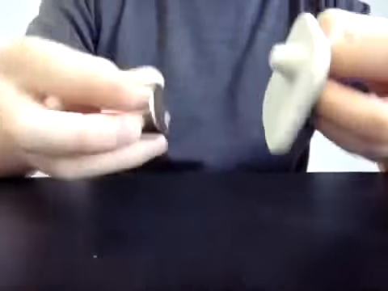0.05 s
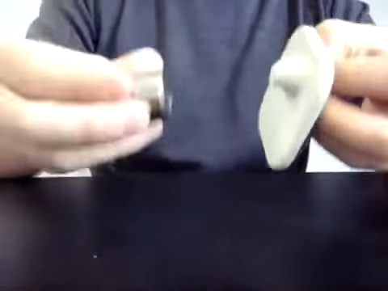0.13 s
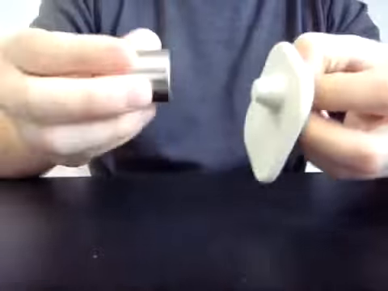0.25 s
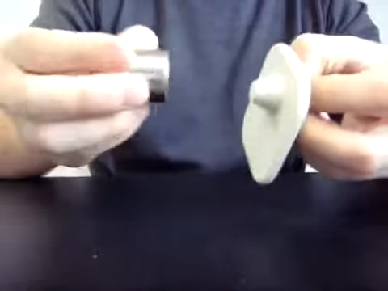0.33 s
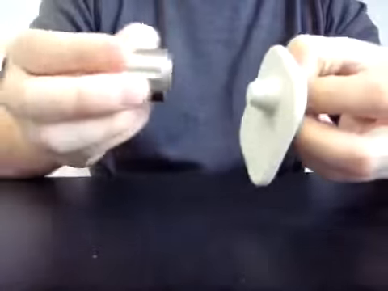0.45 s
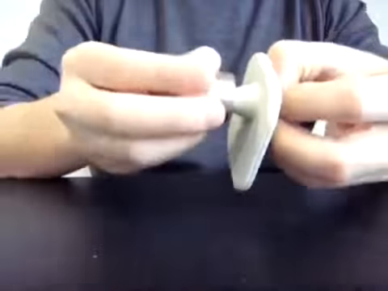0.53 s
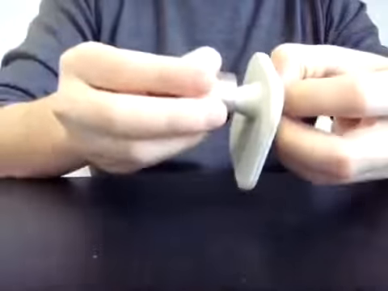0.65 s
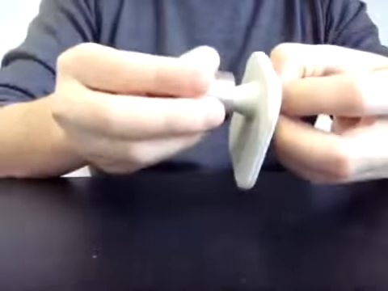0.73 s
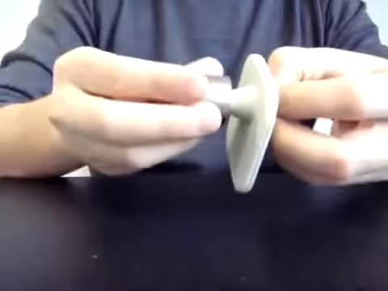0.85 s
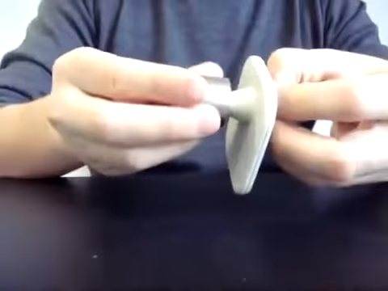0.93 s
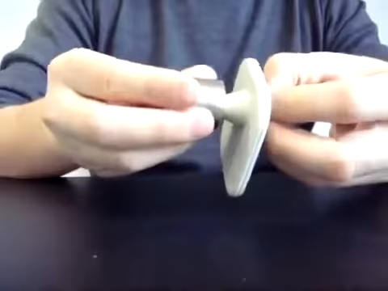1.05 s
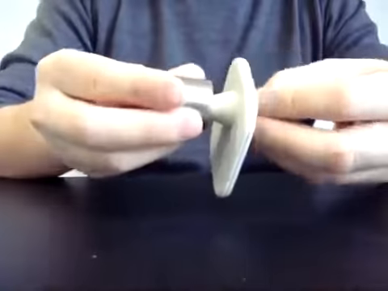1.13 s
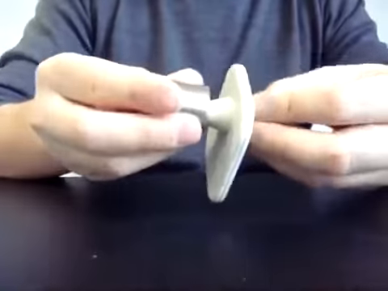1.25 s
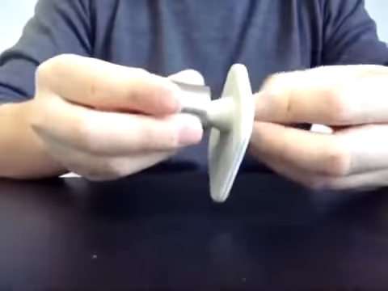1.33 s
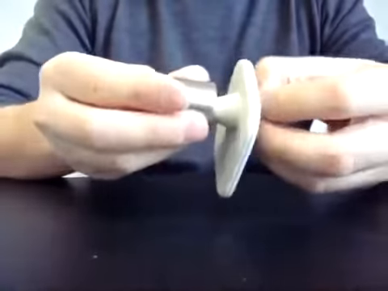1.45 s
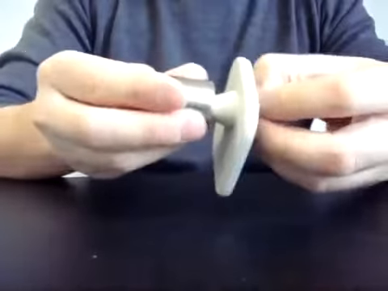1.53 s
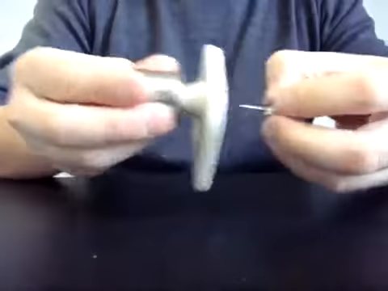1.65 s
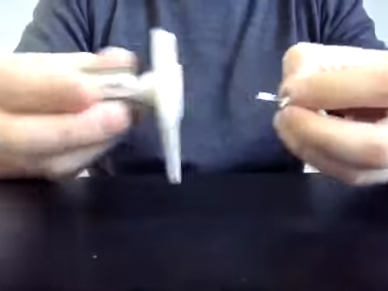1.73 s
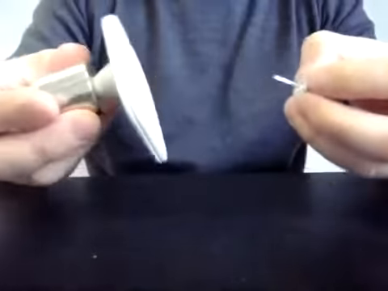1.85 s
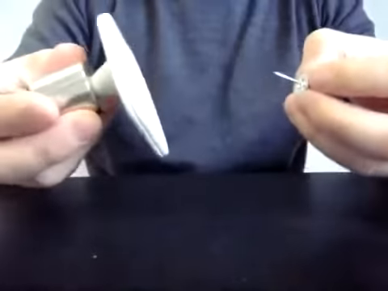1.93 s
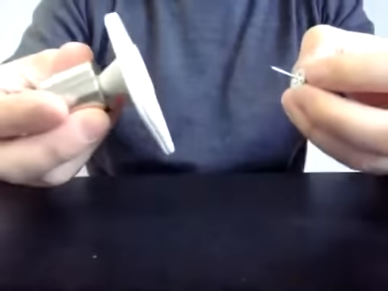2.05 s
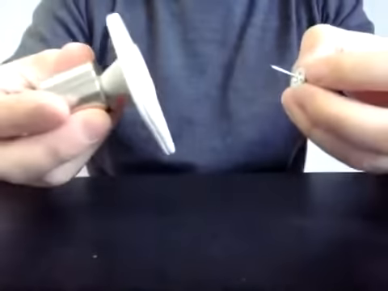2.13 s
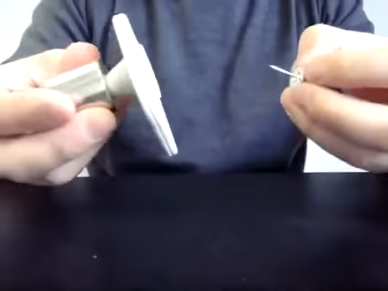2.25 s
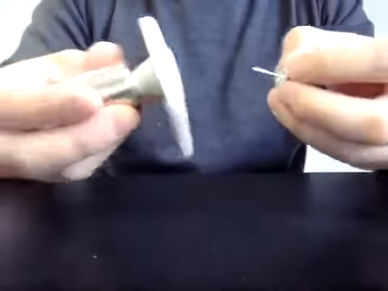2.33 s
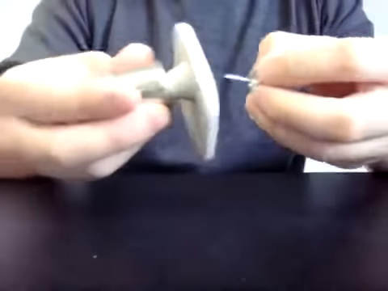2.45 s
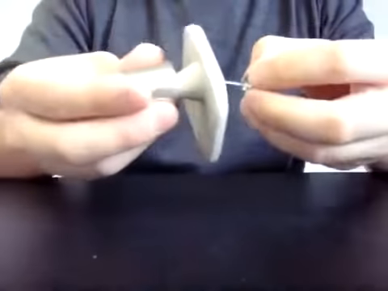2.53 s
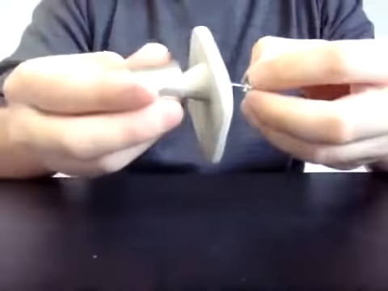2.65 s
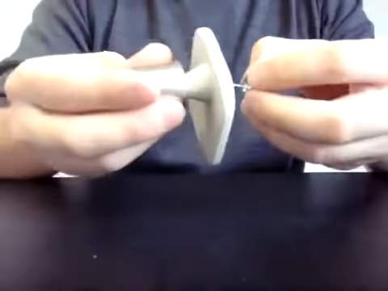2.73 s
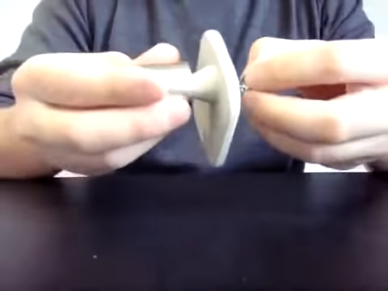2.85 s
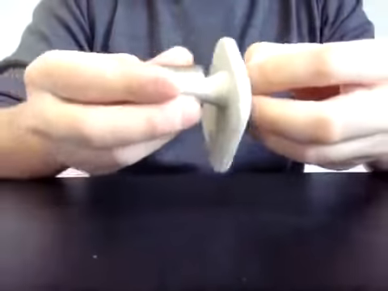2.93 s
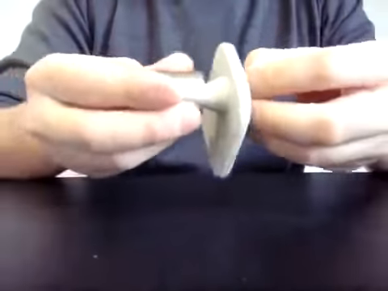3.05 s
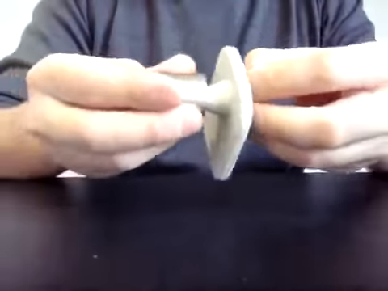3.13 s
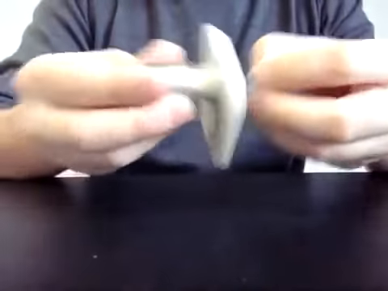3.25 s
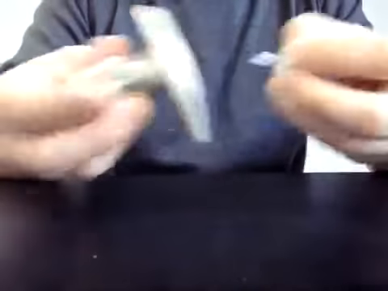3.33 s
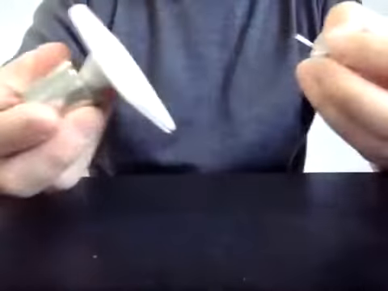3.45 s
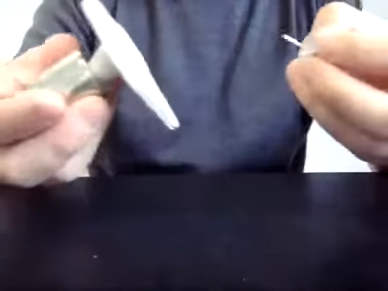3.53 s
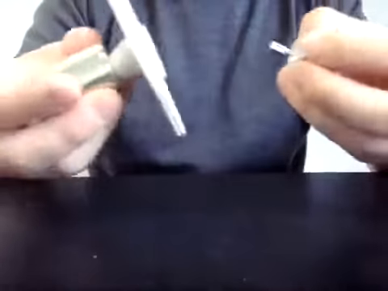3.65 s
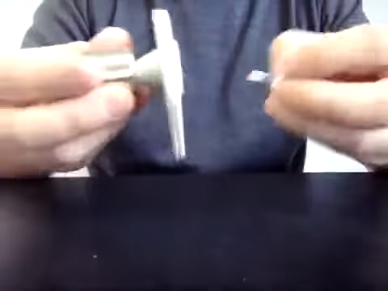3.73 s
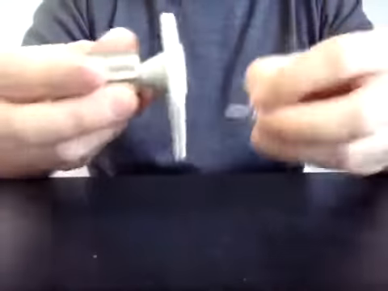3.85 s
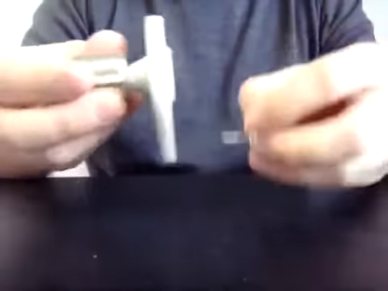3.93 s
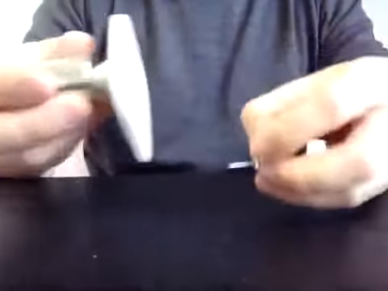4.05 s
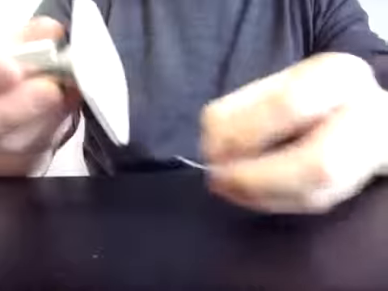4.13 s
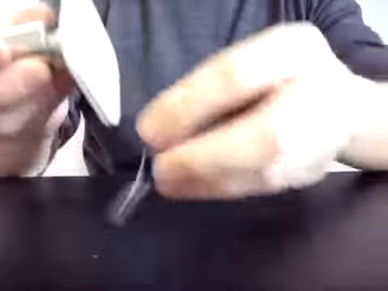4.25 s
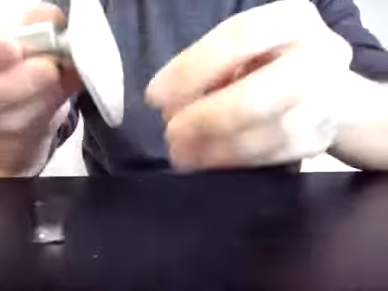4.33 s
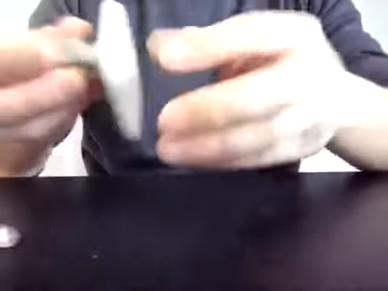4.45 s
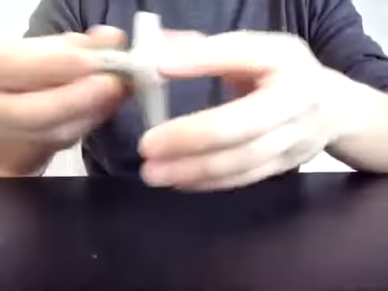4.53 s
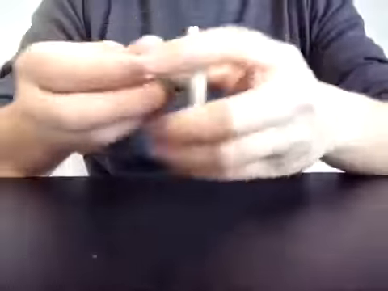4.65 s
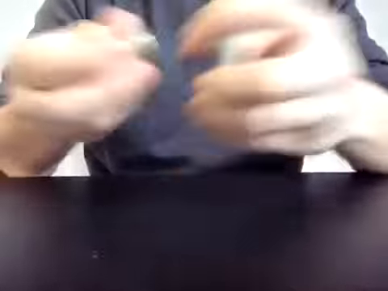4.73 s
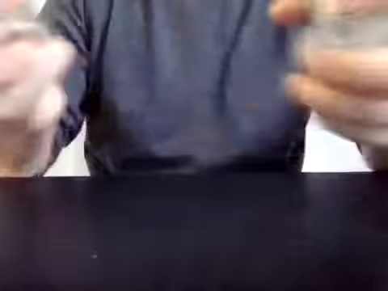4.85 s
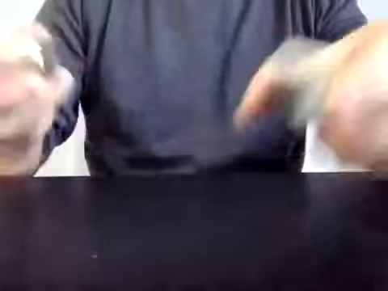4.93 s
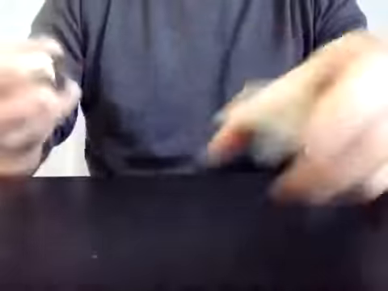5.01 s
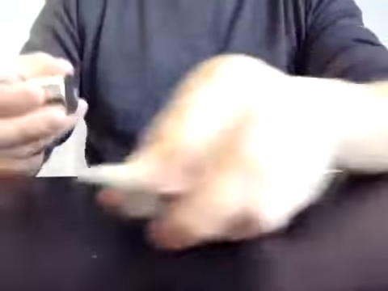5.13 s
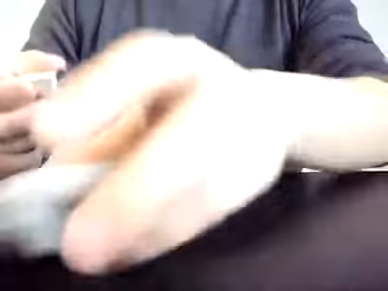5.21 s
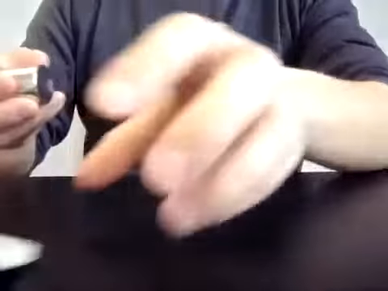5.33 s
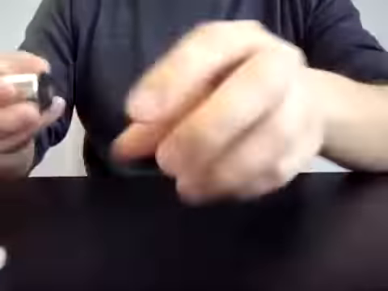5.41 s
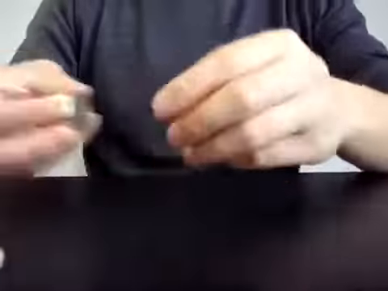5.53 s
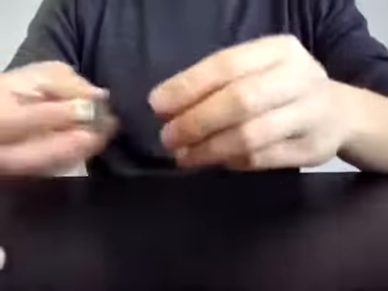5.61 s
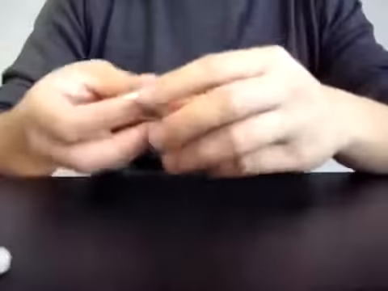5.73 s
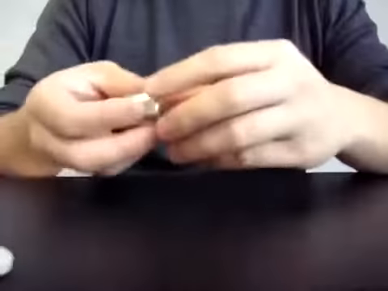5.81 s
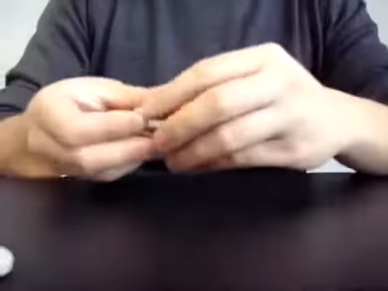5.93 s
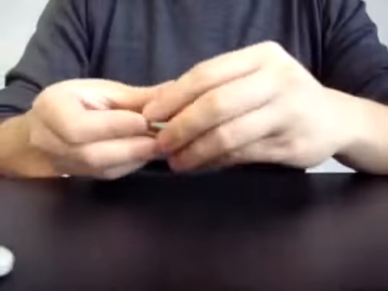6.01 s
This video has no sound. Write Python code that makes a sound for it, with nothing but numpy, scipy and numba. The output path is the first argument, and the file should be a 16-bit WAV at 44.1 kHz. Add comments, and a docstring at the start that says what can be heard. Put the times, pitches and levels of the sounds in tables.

```python
"""A steel magnet snaps onto a plastic tag close to a small microphone: ringing noise that fades band by band.
A pin ticks in and out of the tag, each tick a tiny gritty push that rings the magnet and tag.
The pin drops and bounces on a wooden table; the tag is pulled off, scraped and dumped there.
Blows ring the wood, rattles ring the loose tag, and shaped noise makes the rubbing and rustling.
A small room answers all but the snap and the background of hiss, a thin whine and a mains hum."""
import sys
import numpy as np
from scipy import signal
from scipy.fft import rfft, irfft
from scipy.io import wavfile
from scipy.ndimage import uniform_filter1d
from numba import njit

SR = 44100
rng = np.random.default_rng(int(sys.argv[2]) if len(sys.argv) > 2 else 0)


def log_audio(samples):
    """Write samples as a 16-bit WAV file to the path given in sys.argv[1]."""
    # one column per channel
    frames = np.atleast_2d(samples).T
    # limit to full scale, then quantise
    limited = np.clip(frames, -1, 1)
    pcm = np.round(limited * 32767).astype(np.int16)
    wavfile.write(sys.argv[1], SR, pcm)


N = 268128  # length of the scene in samples

# Hiss spectrum: (frequency [Hz], level per Hz [dB]); only its shape counts
HISS_SHAPE = [(15, -58), (25, -28), (60, -18), (170, -11.5), (450, -10.5), (756, -13), (2000, -18),
              (5760, -25), (9050, -29), (11000, -20)]
HISS_DB = -50.5
# Mains hum tones: (frequency [Hz], level [dB])
HUM_TONES = [(199.5, -59), (300.5, -61.5), (399.5, -70)]
WHINE_HZ, WHINE_WIDTH_HZ, WHINE_DB = 8980, 510, -66.5  # a narrow band of hiss

# Sleeves and skin rustling; the levels are those between 5 and 10 kHz:
# (start [s], turning point of the level [s], cut-off [s],
#  start level [dB], turning level [dB], level towards the cut-off [dB])
RUSTLES = [(0., .05, 0.41, -58, -62, -70), (1.58, 1.64, 1.72, -71, -66, -74),
           (3.3, 3.345, 3.37, -74, -52, -78), (4.15, 4.31, 4.375, -64, -51, -54),
           (4.44, 4.55, 4.67, -52, -49, -66), (4.67, 4.7, 4.745, -48, -49, -51),
           (4.87, 4.93, 4.96, -48, -54, -52), (4.945, 5.005, 5.04, -50, -40, -48),
           (5.025, 5.1, 5.17, -53, -50, -51), (5.155, 5.2, 5.285, -49, -44, -49),
           (5.29, 5.33, 5.5, -40, -40, -44), (5.485, 5.6, 5.76, -46, -49, -62)]
# Pin and fingers rubbing on the tag; levels are of the hollow sound, open grit is relative to it;
# a stroke cut off before its turning point never reaches it, one cut off before its start is silent:
# (start [s], turning point of the level [s], cut-off [s],
#  start level [dB], turning level [dB], level towards the cut-off [dB],
#  hollow pitch at start [Hz], hollow pitch at cut-off [Hz], open grit [dB])
RUB_STROKES = [(1.5, 1.68, 1.93, -63, -58, -65, 1250, 1450, -3),
               (2.68, 2.734, 2.7, -62, -50.5, -62, 970, 965, -14),
               (3.27, 3.31, 3.45, -61, -58.5, -67, 1480, 1230, 2),
               (4.18, 4.204, 4.17, -62, -48.5, -63, 1030, 1050, -22),
               (4.23, 4.26, 4.42, -58, -53, -70, 1100, 1250, -1),
               (4.86, 4.92, 4.985, -41, -47, -47, 1760, 2650, -16),
               (4.987, 5.02, 5.13, -45, -53.5, -60, 2590, 2540, -15),
               (5.155, 5.208, 5.228, -43, -33.5, -50, 1370, 1600, 0.5)]
# The tag dragged over the table:
# (start [s], turning point of the level [s], cut-off [s],
#  start level [dB], turning level [dB], level towards the cut-off [dB],
#  hollow pitch at start [Hz], hollow pitch at cut-off [Hz], open grit [dB])
DRAG_STROKES = [(5.292, 5.363, 5.48, -33, -28.5, -35, 1620, 1150, 7),
                (5.468, 5.49, 5.57, -40, -30, -60, 2480, 2300, -14)]
DRAG_RUMBLE_DB, DRAG_RUMBLE_HZ = -8, 95

# Resonances of magnet and tag held together: (frequency [Hz], width [Hz], level [dB])
HELD_MODES = [(966, 39, -4), (1375, 68, -10), (1620, 160, -7.5), (2250, 123, -2.5), (2356, 59, -1),
              (3030, 170, -4.5), (3460, 130, -7.5), (4104, 150, -2), (4260, 350, -3.5), (4660, 220, -4),
              (5020, 770, -4.5), (6990, 840, -3), (7650, 680, -9), (8450, 480, -6)]
# Resonances of the loose tag: (frequency [Hz], width [Hz], level [dB])
LOOSE_MODES = [(1550, 75, -28), (2020, 1340, 7.5), (2644, 27, 4), (3200, 370, -4.5), (3585, 110, -0.5),
               (3770, 27, -1.5), (4980, 50, -9.5), (5550, 170, -15), (6620, 280, -13.5), (9760, 1400, -14)]
# Resonances of the table top: (frequency [Hz], width [Hz], level [dB])
TABLE_MODES = [(313.6, 15, -0.5), (377, 36, -3.5), (508, 127, -0.5), (671, 29, -4), (840, 150, -2.5),
               (1160, 350, -1.5), (1357, 89, -10), (1750, 270, -9.5), (2250, 320, -14), (3170, 1000, -32)]

SNAP_S, SNAP_DB, SNAP_HOLD_S = .634, -16, 0.033  # start, level, time at full level
# How slowly the snap fades: (frequency [Hz], time to fall by 60 dB [s])
SNAP_FADE = [(200, 0.17), (600, 0.37), (990, 0.3), (1700, 0.38), (2340, 0.44), (3000, 0.21), (3700, 0.44),
             (4280, 0.53), (5000, 0.45), (7000, 0.42), (10000, 0.25)]

# Pin and clutch ticking in the held tag; the click is relative to the ringing body:
# (time [s], body level [dB], contact [s], click pitch [Hz], click level [dB])
TICK_HITS = [(1.588, -48.5, 0.0018, 4500, 12.5), (1.614, -49, 0.0058, 4670, 14),
             (1.644, -45, 0.0065, 4600, 3), (1.627, -48, .004, 6000, 4), (1.675, -37, .002, 8500, -3),
             (2.696, -47, 0.0017, 4900, 4), (2.8754, -31.5, 0.0026, 950, -24),
             (2.723, -50.5, 0.0039, 935, 5.5), (3.012, -46, 0.015, 1290, 10.5),
             (3.032, -32, 0.0061, 4340, 2), (3.0398, -14, .001, 4500, -0.5),
             (3.045, -14, 0.00096, 4900, -1), (3.0521, -22.5, 0.0021, 2360, -5.5),
             (3.071, -33, 0.0037, 3500, -5), (3.084, -41, .005, 2450, -6), (3.289, -40, 0.0028, 4530, -0.5),
             (3.305, -42, 0.0051, 1400, -5), (3.338, -40.5, 0.0032, 4770, 6),
             (3.357, -34, 0.0041, 4100, -2.5), (3.385, -43, 0.0025, 4940, -3)]
# treble tilt per octave; each second of contact would take off this much tilt, so long contacts are duller
TICK_TILT_DB, TICK_DULLING_DB_PER_S = 1.5, 1503

# Blows on the table; the click is relative to the ringing body:
# (time [s], body level [dB], click pitch [Hz], click level [dB])
KNOCK_HITS = [(4.385, 2.5, 1240, -5), (4.388, 5.5, 678, -3), (4.393, 4.5, 1010, -3.5),
              (4.398, -9.5, 1210, -5), (4.405, -12, 1030, -10), (4.412, -23, 1300, -3),
              (4.42, -21, 853, -9), (4.429, -3.5, 1030, -0.5), (4.4507, -18, 905, 1),
              (4.462, -22.5, 1130, 6), (4.468, -15.5, 760, -1), (4.49, -21, 920, -6),
              (4.5355, -23, 794, -6), (4.5395, -22, 1108, -2.5), (4.544, -22, 1350, -7),
              (4.61, -22.5, 990, -10), (4.613, -22.5, 1320, -5), (4.617, -26, 890, 0),
              (4.678, -24.5, 763, -10), (4.683, -18, 770, -5), (4.747, -3.5, 870, -9),
              (4.785, -8.5, 856, -7), (4.799, -22, 900, -4), (4.992, -28, 568, 0), (5.011, -22.5, 1560, -5),
              (5.155, -18, 1350, -6), (5.302, -3, 308, -10.5), (5.321, -13.5, 322, -6),
              (5.33, -13.5, 318, 4.5), (5.342, -7.5, 869, -.5), (5.348, -11, 540, -3.5),
              (5.374, -4, 1530, -18), (5.377, -10.5, 306, -3), (5.39, -3.5, 860, -11), (5.398, -7, 814, -6),
              (5.407, -7, 795, -4.5), (5.428, -12.5, 322, 1), (5.445, -4, 787, -4),
              (5.4715, -12.5, 880, -3.5), (5.504, -15, 764, -5), (5.53, -27.5, 335, -1.5),
              (5.734, -38.5, 826, -2)]
# contact of a 0 dB blow; weak blows last longer, by gain ** -softening; tilt per octave
KNOCK_CONTACT_S, KNOCK_SOFTENING, KNOCK_TILT_DB = .00005, 0.18, 3.5

# The loose tag rattling: (time [s], body level [dB], click pitch [Hz])
RATTLE_HITS = [(4.8375, -11, 2380), (4.8414, -7, 2310), (4.852, -16.5, 2200), (4.865, -42, 1900),
               (4.881, -32, 2710), (4.984, -25.5, 2580), (4.998, -27, 3700), (5.012, -26, 2550),
               (5.2876, -29.5, 1903), (5.3025, -8, 1690), (5.3143, -7.5, 4140), (5.341, -10.5, 2600),
               (5.3535, -4.5, 2400), (5.3723, -14.5, 1510), (5.3983, -12.5, 2630), (5.4152, -9.5, 2620),
               (5.4313, -15, 2720), (5.4439, -17, 2590), (5.4894, -10, 3540), (5.5148, -29, 2350),
               (5.707, -46, 2370)]
LET_GO_S = 5.28  # until then a hand damps the tag
GRIPPED_CONTACT_S, FREE_CONTACT_S = 0.0024, .0034
RATTLE_TILT_DB, RATTLE_CLICK_DB = 3.5, -4.5  # tilt per octave; click relative to the body

ROOM_T60_S, ROOM_DB, ROOM_DULL_HZ = 0.27, -18.5, 1670
TOP_HZ = 10000  # the recorder passes little above this


def undb(db):
    """Turns decibels into a gain."""
    return 10 ** (np.asarray(db) / 20)


def unit(x):
    """Scales a signal to an average (RMS) level of 1."""
    return x / np.sqrt(np.mean(x ** 2))


def band(x, hz, width):
    """One resonance: lets through a band at least 10 Hz wide around hz."""
    return signal.lfilter(*signal.iirpeak(hz, hz / max(width, 10), SR), x)


def ring(x, modes, tilt_db=0., scatter_db=0., damping=0.92, turn=-1):
    """Sum of resonances: tilt turns about their middle, damping widens them, turn ** k scales mode k."""
    all_hz = np.array(modes)[:, 0]
    middle_hz = np.sqrt(all_hz[0] * all_hz[-1])
    lift_db = tilt_db * np.log2(all_hz / middle_hz) + scatter_db
    total = 0
    for k, (hz, width, db) in enumerate(modes):
        # a negative turn flips every other resonance
        gain = turn ** k * undb(db + lift_db[k]) * np.sqrt(hz / width)
        total = total + gain * band(x, hz, width * damping)
    return total


def colour(x, points):
    """Shapes the spectrum along (Hz, dB) points."""
    point_hz, point_db = np.transpose(points)
    hz = np.maximum(np.arange(len(x) // 2 + 1) * SR / len(x), 1)
    gain = undb(np.interp(np.log(hz), np.log(point_hz), point_db))
    return irfft(rfft(x) * gain, len(x))


def walk(rate):
    """Slow random drift: levels drawn rate times a second, smoothed, with a typical size of 1."""
    step = int(SR / rate)
    levels = np.repeat(rng.standard_normal(N // step + 1), step)
    smooth = uniform_filter1d(uniform_filter1d(levels, step), step)
    return unit(smooth[:N])


def swell(strokes, edge_s):
    """Gain over time: each stroke's level glides, with soft edges, until its cut-off."""
    t, gain = np.arange(N) / SR, 0
    for row in strokes:
        edge = np.clip(np.minimum(t - row[0], row[2] - t) / edge_s, 0, 1)
        gain = gain + edge * undb(np.interp(t, row[:3], row[3:6]))
    return gain


def strike(events, modes, scatter_db, rough, swelling, damping, click_q, thump_db, turn):
    """Each contact is a push that swells and dies; it rings the body and clicks at the pitch of the touched spot."""
    out, t = np.zeros(N + 4096), np.arange(4096) / SR
    grit = rng.standard_normal((len(events), len(t)))
    spot = rng.standard_normal((len(events), len(modes)))  # each touched spot favours other modes
    for k, (start_s, db, contact_s, tilt_db, click_hz, click_db) in enumerate(events):
        x = t / max(contact_s, 3e-5)
        push = (1 + rough * grit[k]) * x ** swelling * np.exp(-x)
        body = ring(push, modes, tilt_db, scatter_db * spot[k], damping, turn)
        click = band(push, click_hz, click_hz / click_q)
        click = band(click, click_hz, 2 * click_hz / click_q)
        hit = body / np.abs(body).max() + undb(click_db) * click / np.abs(click).max()
        # each hit also carries a short, smooth 50 Hz thump, as an overloaded microphone gives
        thump = np.sin(2 * np.pi * 50 * t) * t / .005 * np.exp(-t / .008)
        hit = hit + undb(thump_db) * thump
        i = int(start_s * SR)
        out[i:i + len(t)] -= undb(db) * hit
    return out[:N]


def background():
    """Hiss that drifts a little, a thin whine from filtered noise and a gently wavering mains hum."""
    t = np.arange(N) / SR
    hiss = unit(colour(rng.standard_normal(N), HISS_SHAPE)) * undb(HISS_DB + .5 * walk(3.36))
    whine = unit(band(rng.standard_normal(N), WHINE_HZ, WHINE_WIDTH_HZ)) * undb(WHINE_DB)
    hum = 0
    for hz, db in HUM_TONES:
        level = np.sqrt(2) * undb(db + walk(8))
        hum = hum + level * np.sin(2 * np.pi * hz * t + walk(10) / 2)
    return hiss + whine + hum


@njit
def hollow(x, hz, q):
    """Band-pass whose centre moves, like a hollow changing size; q sets how narrow it is."""
    y, band_state, low_state = np.empty(len(x)), 0., 0.
    for i in range(len(x)):
        g = np.tan(np.pi * hz[i] / SR)
        v = (band_state + g * (x[i] - low_state)) / (1 + g * (g + 1 / q))
        band_state, low_state, y[i] = 2 * v - band_state, low_state + 2 * g * v, v
    return y


def rubbing():
    """Gritty friction, partly through the hollow between hand and plastic; cloth hisses above it."""
    grain = rng.standard_normal(N) * undb(3.1 * walk(300))
    strokes = np.vstack([RUB_STROKES, DRAG_STROKES])
    t, ends_s = np.arange(N) / SR, strokes[:, [0, 2]].ravel()
    hollow_hz = np.interp(t, ends_s, strokes[:, 6:8].ravel())
    cavity = unit(hollow(grain, hollow_hz, 8.))

    open_gain = undb(np.interp(t, ends_s, np.repeat(strokes[:, 8], 2)))
    bare = open_gain * unit(colour(grain, [(300, -2), (1500, 18), (4000, 19.0), (10000, 6)]))

    cloth = colour(rng.standard_normal(N) * undb(2 * walk(150)),
                   [(300, -5.5), (1200, -3.5), (3000, -3), (5000, -4.0), (7000, 2), (11000, -4.5)])
    treble = signal.butter(4, [5000, 10000], "band", fs=SR, output="sos")
    cloth = cloth / np.std(signal.sosfilt(treble, cloth))

    # the drag shakes the table and the tag
    drag = swell(DRAG_STROKES, edge_s=0.027)
    board = undb(4.5) * unit(ring(grain, TABLE_MODES))
    board += undb(DRAG_RUMBLE_DB) * unit(band(grain, DRAG_RUMBLE_HZ, 70.))
    board += undb(-2.5) * unit(ring(grain, LOOSE_MODES, damping=3.5))

    friction = (cavity + bare) * (swell(RUB_STROKES, edge_s=0.013) + drag)
    return friction + board * drag + cloth * swell(RUSTLES, edge_s=.012)


def snap():
    """A hard crack whose dense echo stays level for a moment, then fades band by band, over a low thump."""
    t = np.arange(int(.6 * SR)) / SR
    noise = rng.standard_normal(len(t))
    dense = unit(unit(ring(noise, HELD_MODES)) + undb(-3.0) * noise)
    # split into short time frames and frequency bands, so each band can fade at its own speed
    fade_hz, t60_s = np.transpose(SNAP_FADE)
    hz, frame_s, spectrum = signal.stft(dense, SR, nperseg=256)
    band_t60_s = np.interp(np.log(hz + 1), np.log(fade_hz), t60_s)[:, None]
    fade = np.maximum(frame_s - SNAP_HOLD_S, 0) / band_t60_s
    tail = signal.istft(spectrum * undb(-60 * fade), SR)[1][:len(t)]
    thump = undb(-13.0) * np.sin(2 * np.pi * 17.0 * t) * np.exp(-t / 0.031)
    out, i = np.zeros(N), int(SNAP_S * SR)
    out[i:i + len(t)] = undb(SNAP_DB) * (tail + thump)
    return out


def ticking():
    """Gritty little contacts inside the gripped tag; longer contacts sound duller."""
    hits = []
    for start_s, db, contact_s, click_hz, click_db in TICK_HITS:
        tilt_db = TICK_TILT_DB - TICK_DULLING_DB_PER_S * contact_s
        hits.append((start_s, db, contact_s, tilt_db, click_hz, click_db))
    return strike(hits, HELD_MODES, 1.5, rough=5., swelling=.5, damping=3., click_q=6., thump_db=-38., turn=-1)


def knocking():
    """Hard, clean blows on wood, which swallows the treble."""
    hits = []
    for start_s, db, click_hz, click_db in KNOCK_HITS:
        contact_s = KNOCK_CONTACT_S * undb(-KNOCK_SOFTENING * db)
        hits.append((start_s, db, contact_s, KNOCK_TILT_DB, click_hz, click_db))
    knocks = strike(hits, TABLE_MODES, 4.6, rough=0.015, swelling=0.91, damping=0.84,
                    click_q=3.23, thump_db=-39.0, turn=0.92)
    return signal.sosfilt(signal.butter(3, 3000., fs=SR, output="sos"), knocks)


def rattling():
    """The tag chatters at each contact, briefly and dully in the hand, ringing once let go."""
    gripped, free = [], []
    for start_s, db, click_hz in RATTLE_HITS:
        in_hand = start_s < LET_GO_S
        contact_s = GRIPPED_CONTACT_S if in_hand else FREE_CONTACT_S
        hit = (start_s, db, contact_s, RATTLE_TILT_DB, click_hz, RATTLE_CLICK_DB)
        (gripped if in_hand else free).append(hit)
    dull = strike(gripped, LOOSE_MODES, 5.8, rough=5., swelling=1.15, damping=9.,
                  click_q=6.3, thump_db=-36.0, turn=-1.11)
    ringing = strike(free, LOOSE_MODES, 2.9, rough=5., swelling=0.89, damping=2.6,
                     click_q=3.3, thump_db=-26.0, turn=-1.05)
    return dull + ringing


def room(x):
    """A dense, slightly dull tail of fading noise that starts with the first wall echo, after 4 ms."""
    t = np.arange(int(.6 * SR)) / SR
    echo = rng.standard_normal(len(t)) * undb(-60 * t / ROOM_T60_S) * (t > .004)
    echo = signal.lfilter(*signal.butter(1, ROOM_DULL_HZ, fs=SR), echo)
    echo = echo / np.sqrt(np.sum(echo ** 2))
    return undb(ROOM_DB) * signal.fftconvolve(x, echo)[:N]


def scene():
    """Near sounds, their room echo, the snap and the background."""
    near = ticking() + knocking() + rattling() + rubbing()
    return (near + room(near) + snap() + background())[None]


def record(dry):
    """The recorder rounds the loudest peaks and cuts the top."""
    rounded = np.tanh(1.3 * dry) / 1.3
    steep = signal.ellip(10, .3, 40, TOP_HZ, fs=SR, output="sos")
    slope = signal.butter(8, TOP_HZ + 500, fs=SR, output="sos")
    return signal.sosfilt(np.vstack([steep, slope]), rounded)


dry = scene()
out = record(dry)
log_audio(out)
```